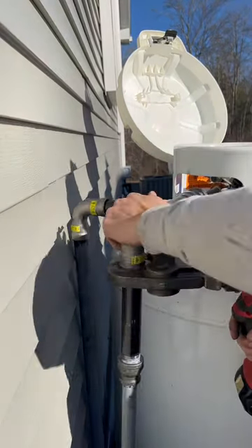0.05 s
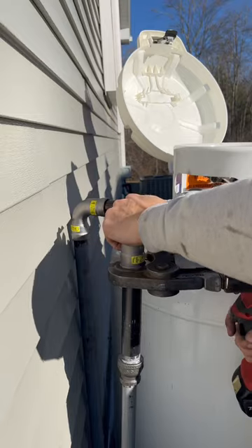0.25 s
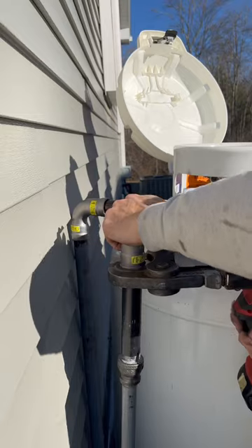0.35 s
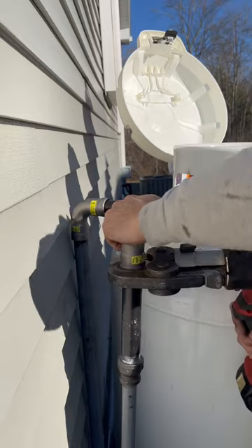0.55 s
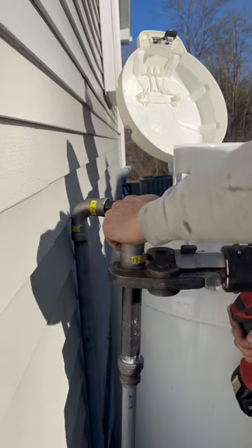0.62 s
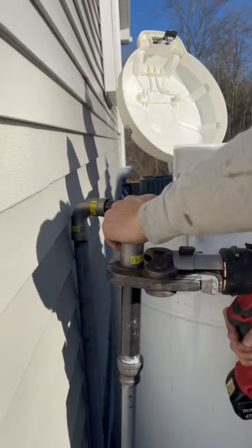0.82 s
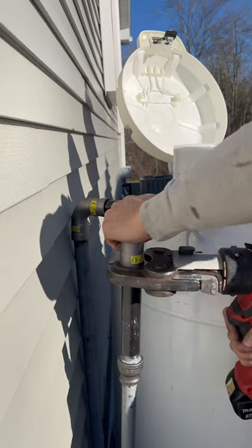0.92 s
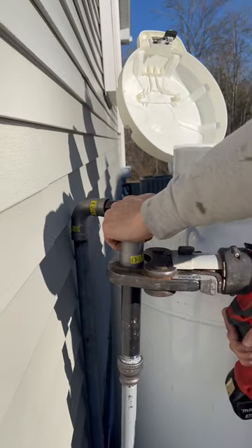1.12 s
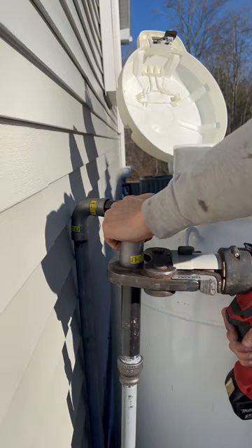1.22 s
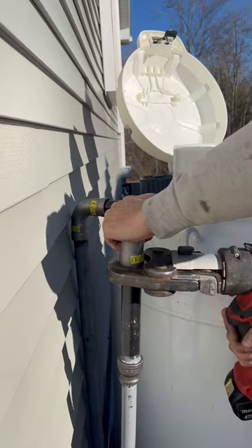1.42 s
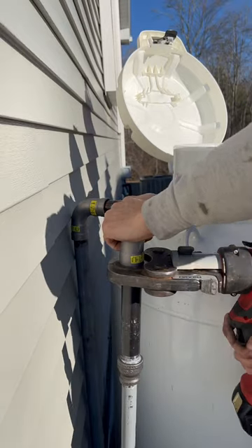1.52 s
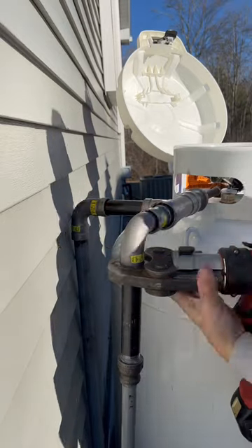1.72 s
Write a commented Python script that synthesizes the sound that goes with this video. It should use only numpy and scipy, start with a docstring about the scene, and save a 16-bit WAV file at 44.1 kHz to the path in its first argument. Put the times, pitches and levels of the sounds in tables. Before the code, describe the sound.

A cordless press tool crimps a pipe fitting close by, outdoors. The trigger clicks, the motor whines, then drops in pitch into a rattling buzz. A valve snaps, the motor stops and steel rings faintly. Light wind bumps the microphone.

```python
"""A cordless hydraulic press tool crimps a pipe fitting, outdoors beside a wall.
The trigger clicks and the geared motor spins up to a free whine. The jaws scrape on and bite:
the pitch sags and each pump stroke chops the whine into a buzz. The release valve snaps,
the motor stops, the steel rings faintly and one last click follows.
Throughout, light wind bumps the microphone over a quiet wash of air."""
import sys
import numpy as np
from scipy import signal
from scipy.fft import rfft, irfft
from scipy.io import wavfile
from scipy.ndimage import uniform_filter1d, map_coordinates

SR = 44100
rng = np.random.default_rng(int(sys.argv[2]) if len(sys.argv) > 2 else 0)


def to_wav(sig):
    """Store sig (one row per channel, or 1-D mono) as 16-bit WAV at the path in sys.argv[1].

    Samples outside -1..1 are clipped; the rate is SR.
    """
    pcm = np.clip(np.atleast_2d(sig), -1, 1) * 32767
    pcm = np.round(pcm).astype(np.int16)
    wavfile.write(sys.argv[1], SR, pcm.T)  # frames by channels


N = 77175
T = np.arange(N) / SR
HZ = np.fft.rfftfreq(N, 1 / SR)

# How hard the tool works: t/s, pump load 0-1, whine drive/dB, rattle level/dB
EFFORT = [(.42, 0, -49, -33), (.445, 0, -26.5, -27), (.52, 0, -27, -28), (.6, 0.02, -23.5, -26),
          (.65, 0.21, -28.5, -26), (.71, 0.2, -26.5, -27.5), (.77, .6, -24, -22), (.85, 0.74, -30.5, -23),
          (1, 0.76, -32.5, -24), (1.15, 0.79, -34, -25.5), (1.34, 0.94, -39.5, -27),
          (1.395, 0.9, -43, -26.5), (1.45, 1, -52, -25)]
# Bright EQ of the clicks and the oil hiss: f/Hz, gain/dB
CLICK_EQ = [(30, -55), (150, -32), (700, -9), (1600, 1), (4000, -2), (8000, 2), (11500, 5), (14000, -6),
            (16000, -4.5)]
# EQ of the open air and the echo: f/Hz, gain/dB
AIR_EQ = [(30, -39), (200, 3.5), (500, 2.5), (1000, -4), (2500, -11.5), (4000, -22), (7000, -15.5),
          (12000, -22.5), (16000, -19)]


def motor():
    """The geared motor drives the pump; whine, tones and rattle all follow its stroke rate."""
    stroke_rate = [(.42, 150), (.431, 187), (.439, 209.5), (.455, 213.5), (.49, 215.5), (.58, 216.4),
                   (.617, 215.5), (.656, 207), (.712, 205.5), (.752, 199), (.788, 186.4), (.81, 181),
                   (.86, 177.9), (1.002, 175.7), (1.09, 173), (1.18, 171.9), (1.292, 175.2), (1.338, 173.7),
                   (1.376, 167), (1.45, 145)]  # pump speed: t/s, rate/Hz
    start_s, stop_s = .419, 1.458
    turns = np.cumsum(curve(stroke_rate)) / SR  # one turn per pump stroke
    load = np.clip(curve(EFFORT), 0, 1)
    running = np.clip((T - start_s) / .0019, 0, 1) * np.exp(-np.maximum(T - stop_s, 0) / .004)
    return running * (gear_whine(turns, load) + drive_tones(turns) + rattle(turns, load) + jaw_scrape())


def gear_whine(turns, load):
    """Teeth mesh in a resonant gearbox; each loaded stroke slows the gears and presses them together."""
    gearbox_eq = [(4500, -8), (5400, -6), (5900, 6), (6250, -4), (6580, 5.5), (6850, -3.5), (7800, 0),
                  (9000, 10)]  # gearbox resonances: f/Hz, gain/dB
    teeth = 36
    swing = 2.3 * load * np.sin(2 * np.pi * (turns + .17))
    depth = 1.2 * np.sqrt(load)
    chop = np.exp(depth * np.cos(2 * np.pi * turns)) / np.sqrt(np.i0(2 * depth))  # constant power
    mesh = np.sqrt(2) * np.sin(2 * np.pi * teeth * turns + swing + .051 * wobble(250))
    mesh *= chop * (1 + .066 * wobble(300))
    whine = irfft(rfft(mesh) * amp(spectrum(gearbox_eq)), N)
    return pan(-3) * amp(curve(EFFORT, column=2)) * whine


def drive_tones(turns):
    """Motor, gears and pump sing harmonics of the stroke rate; a buzz joins them under load."""
    partials = [(1, 0.454, .55, -48, 0), (1, 0.62, 0.73, -47, 0), (1, 0.845, 1.08, -60.5, 2),
                (2, 0.597, .72, -38.5, 1), (3, 0.565, 0.66, -44.5, -1), (4, .58, .69, -43, 1),
                (6, 0.439, .79, -41.5, -0.5), (8, 0.82, 1.04, -46.5, 0), (8, 1.04, 1.38, -44, 2),
                (33, 0.43, 0.8, -37, -5.5), (34, .44, .64, -55, 4), (48, 0.429, 0.634, -33, -1),
                (48, 0.61, 0.705, -41, -1)]  # passing tones: harmonic, on/s, off/s, level/dB, left minus right/dB
    buzz_partials = [(3, -10), (4, -13), (5, -4), (6, 0), (7, -10), (9, 1.5), (10, -1.5), (11, 0),
                     (12, -0.5), (13, -0.5), (14, -13), (15, 1.5), (16, -0.5), (17, -3), (19, -14),
                     (21, -12), (22, -10), (23, -2.5)]  # timbre of the loaded pump: harmonic, gain/dB
    buzz_fader = [(.7, -58), (.8, -48), (.95, -48.5), (1.15, -60), (1.33, -61), (1.43, -52.5)]  # envelope of that buzz: t/s, level/dB
    fade_s, waver = .03, .25

    def harmonic(k):
        tone = np.sqrt(2) * np.sin(2 * np.pi * (round(k) * turns + rng.random()))
        return tone * (1 + waver * wobble(59))

    tones = np.zeros((2, N))
    for k, on, off, db, side_db in partials:
        fade = np.clip(np.minimum(T - on, off - T) / fade_s + .5, 0, 1)
        tones += pan(side_db) * amp(db) * fade * harmonic(k)
    buzz = sum(amp(db) * harmonic(k) for k, db in buzz_partials)
    return tones + amp(curve(buzz_fader)) * buzz


def rattle(turns, load):
    """Piston and valves knock on each stroke: loosely when running free, hard and evenly under load."""
    knocks = [(-.06, .05, 2.8), (.37, .04, 3.3), (.21, .05, .8)]  # hits within a stroke: position/strokes, width/strokes, strength
    free_eq = [(30, -60), (100, -60), (250, 1), (600, -8), (1000, -8.5), (1400, -0.5), (2200, -4),
               (3300, -1), (5100, -4), (6200, -3.5), (7300, 3), (8800, -2), (11300, -1), (13400, -5),
               (15500, -6)]  # free-running rattle: f/Hz, gain/dB
    loaded_eq = [(30, -65), (100, -17), (300, -13.5), (700, -17), (1500, -5.5), (2100, -8.5), (2600, -7),
                 (3900, -1), (4700, -13), (5500, 0), (6500, 2.5), (7400, -3), (8200, 4), (8650, 0.5),
                 (8950, 1.5), (9500, 3), (10200, 0.5), (11000, 1.5), (12200, 3.5), (12750, -1), (13400, 4),
                 (15500, -6.5)]  # rattle under load: f/Hz, gain/dB
    pulses = sum(gain * np.exp(-(((turns - at + .5) % 1 - .5) / width) ** 2)
                 for at, width, gain in knocks)
    accents = unit(1 + pulses)
    free = colour(housing(stroke_grit(turns, repeat=.3) * np.sqrt(accents)), free_eq)
    loaded = colour(housing(level_bands(stroke_grit(turns, repeat=.83) * accents)), loaded_eq)
    bite = np.clip(load / .8, 0, 1)
    return amp(curve(EFFORT, column=3)) * (np.sqrt(1 - bite) * free + np.sqrt(bite) * loaded)


def stroke_grit(turns, repeat):
    """Each stroke inherits some grit from the last; its out and back halves share part of their treble."""
    stroke_samples, twin_above_harmonic = 320, 58
    fresh = rng.standard_normal((2, N // 100, stroke_samples))
    grit = signal.lfilter([1], [1, -repeat], fresh, axis=1)
    treble = irfft(rfft(grit) * (np.arange(stroke_samples // 2 + 1) > twin_above_harmonic))
    grit = (grit + .6 * np.roll(treble, stroke_samples // 2, axis=2)).reshape(2, -1)
    return unit(np.array([map_coordinates(side, [turns * stroke_samples], order=3) for side in grit]))


def housing(pair):
    """Many narrow, fixed resonances of the casing ripple the spectrum."""
    ripple = uniform_filter1d(rng.standard_normal(len(HZ)), size=330)
    gain = amp(1.5 * unit(uniform_filter1d(ripple, size=250)))
    return irfft(rfft(pair) * unit(gain), N)


def release_valve():
    """The valve snaps: a bending wave arrives treble first, oil hisses off and the steel rings."""
    snap_eq = [(100, -41), (400, -7.5), (700, -1.5), (1150, 5), (1700, -0.5), (2500, -19), (4000, -9.5),
               (5500, -2.5), (7000, -14), (9000, -10), (16000, -24)]  # body of the snap: f/Hz, gain/dB
    steel_modes = [(1366, -12, .29), (1990, -7.5, 0.68), (3052, -6.5, .55), (3200, -23, 0.82),
                   (3537, -4.5, 0.85), (4070, -8, .39), (5615, -1, 0.27), (6040, 1, 0.39)]  # ringing steel: f/Hz, gain/dB, t60/s
    shimmer_eq = [(30, -50), (500, -15), (1400, 3), (2500, 3.5), (3500, 8.5), (4600, -2), (6100, 1),
                  (8000, -4.5), (12000, -10), (16000, -10)]  # noisy tail of the ring: f/Hz, gain/dB
    snap_s = 1.4512
    arrival_s = snap_s + .00225 * np.sqrt(1000 / (HZ + 100))
    phase = -2 * np.pi * np.cumsum(arrival_s) * SR / N
    snap = pan(1.1) * amp(5.5) * irfft(2 * amp(spectrum(snap_eq)) * np.exp(1j * phase), N)
    age = np.maximum(T - snap_s, 0)
    ring = np.zeros((2, N))
    for hz, db, t60 in steel_modes:
        mode = np.sin(2 * np.pi * hz * age + rng.normal(0, .47, (2, 1)))
        ring += amp(db - 60 * age / t60) * mode * (age > 0)
    shimmer = amp(-47.5) * burst(snap_s, rise_s=.001, decay_s=.095) * noise(shimmer_eq)
    oil_hiss = amp(-35) * burst(snap_s, rise_s=.001, decay_s=.012) * noise(CLICK_EQ, tilt_db=-2)
    return snap + amp(-47.5) * ring + shimmer + oil_hiss


def clicks():
    """Trigger, switch and jaws click: short, dry scrapes of plastic and steel."""
    hits = [(.021, -39, .0015, -1.5), (.047, -40, 0.0013, -1.5), (0.2328, -35, 0.0086, -2),
            (0.2359, -22, 0.004, 6.5), (0.2428, -20, 0.0024, 0), (.336, -39.5, 0.0026, -2),
            (0.409, -46, 0.0016, -6.5), (0.422, -27.5, 0.012, 5.5), (1.742, -28.5, 0.0069, -2)]  # click cues: t/s, level/dB, decay/s, tilt/(dB per octave)
    return sum(amp(db) * burst(s, .0014, decay) * noise(CLICK_EQ, tilt) for s, db, decay, tilt in hits)


def jaw_scrape():
    """The jaws grind onto the fitting in two dull swells."""
    scrapes = [(.6, 0.022, -43), (.67, .04, -46)]  # scrape cues: t/s, width/s, level/dB
    scrape_eq = [(30, -45), (130, -11), (260, 1), (500, -8), (750, 2.5), (1100, -8), (3000, -25),
                 (16000, -50)]  # low-mid grind: f/Hz, gain/dB
    return np.sqrt(swell_power(scrapes)) * noise(scrape_eq)


def wall_echo(tool):
    """Wall and yard return a short, diffuse tail."""
    t60_s = .26
    tail = noise(AIR_EQ, tilt_db=2.1) * amp(-60 * T / t60_s)
    return signal.fftconvolve(tool, tail / np.linalg.norm(tail[0]), axes=1)[:, :N]


def outdoors():
    """Wind bumps the microphone over faint handling rubs and a bed of air."""
    gusts = [(.02, 0.0083, -46), (0.132, 0.0062, -44.5), (.33, 0.013, -52.5), (0.769, 0.036, -45),
             (1.089, 0.0057, -38), (1.137, .014, -37), (1.18, .014, -36.5), (1.26, 0.022, -41.5),
             (1.39, 0.046, -45), (1.52, 0.025, -44), (1.58, .012, -46), (1.65, 0.016, -44),
             (1.702, 0.0065, -39), (1.745, 0.016, -46)]  # wind bumps: t/s, width/s, level/dB
    wind_eq = [(30, -45), (70, -39), (110, -16.5), (160, -5), (240, 0.5), (320, -1), (450, -16.5),
               (800, -23), (3000, -39.5), (16000, -83)]  # wind rumble: f/Hz, gain/dB
    rubs = [(.16, 0.068, -65), (1.71, 0.035, -55)]  # handling cues: t/s, width/s, level/dB
    rub_eq = [(30, -40), (1000, -11), (2400, 9), (3200, -7), (4300, 5), (5500, -9), (7300, -5.5),
              (10000, -12.5), (16000, -23)]  # thin handling rustle: f/Hz, gain/dB
    breeze_db, air_db = -61, -58
    wind = np.sqrt(amp(breeze_db) ** 2 + swell_power(gusts)) * noise(wind_eq)
    handling = np.sqrt(swell_power(rubs)) * noise(rub_eq)
    return wind + handling + amp(air_db) * noise(AIR_EQ)


def colour(pair, eq, tilt_db=0):
    """Gives two unrelated signals an EQ, a tilt per octave and the scene's stereo image, at rms 1."""
    coherence = [(100, .95), (250, .7), (500, .85), (1200, .97), (2200, .8), (3000, .65), (4000, .7),
                 (5300, .3), (6000, .55), (6500, .95), (9500, .99), (10400, .92), (11400, .65), (13500, .6),
                 (16000, .5)]  # how alike the channels are: f/Hz, correlation
    balance = [(60, 0), (300, 0), (1200, 2), (2900, 3.5), (4100, -3.5), (4800, 4.5), (5500, -10), (6400, 2),
               (8400, -2), (10400, 0), (11500, 6.5), (12800, 5), (15500, -4.5)]  # stereo lean: f/Hz, left minus right/dB
    left_lead = [(1500, 0.51), (2500, -0.38), (3100, -1.3), (4200, -1.17), (5000, 1), (6000, -0.1),
                 (6500, 0.95), (10500, 1), (11300, 0.24), (11800, -0.11), (12800, -3.1), (13400, -0.48),
                 (16000, 1)]  # phase between the channels: f/Hz, lead/rad
    a, b = rfft(pair)
    alike = np.clip(spectrum(coherence), -1, 1)
    mid, side = a * np.sqrt(1 + alike), b * np.sqrt(1 - alike)
    lean = amp(spectrum(balance) / 2) * np.exp(1j * spectrum(left_lead) / 2)
    gain = amp(spectrum(eq) + tilt_db * np.log2(HZ + 1))
    return unit(irfft(np.array([(mid + side) * lean, (mid - side) / lean]) * gain, N))


def noise(eq, tilt_db=0):
    """Coloured stereo noise."""
    return colour(rng.standard_normal((2, N)), eq, tilt_db)


def level_bands(pair):
    """Multiband leveller: holds the energy steady in every broad band."""
    frames = signal.stft(pair, nperseg=512)[2]
    power = uniform_filter1d(uniform_filter1d(abs(frames) ** 2, size=9, axis=1), size=4, axis=2)
    return unit(signal.istft(frames / np.sqrt(abs(power) + 1e-12), nperseg=512)[1][:, :N])


def wobble(hz):
    """Random modulation of rms 1, rolled off above hz."""
    return unit(irfft(rfft(rng.standard_normal(N)) * np.exp(-(HZ / hz) ** 2), N))


def burst(peak_s, rise_s, decay_s):
    """Envelope with a linear attack and an exponential fall."""
    return np.clip((T - peak_s) / rise_s + 1, 0, 1) * np.exp(-np.maximum(T - peak_s, 0) / decay_s)


def swell_power(cues):
    """Power envelope of a set of bell-shaped swells."""
    return sum(amp(db) ** 2 * np.exp(-((T - s) / width) ** 2) for s, width, db in cues)


def curve(table, column=1):
    """One column of a table as an automation curve."""
    table = np.array(table)
    return np.interp(T, table[:, 0], table[:, column])


def spectrum(points):
    """Breakpoints joined on a log frequency axis."""
    hz, value = np.transpose(points)
    return np.interp(np.log(HZ + 1), np.log(hz), value)


def pan(db):
    """Channel gains for a left minus right level."""
    return amp(np.array([[db], [-db]]) / 2)


def amp(db):
    """Decibels to gain."""
    return 10 ** (np.asarray(db) / 20)


def unit(x):
    """Scales to rms 1."""
    return x / np.sqrt(np.mean(abs(x) ** 2) + 1e-20)


def scene():
    """The tool up front, its faint echo behind, and the open air."""
    tool = motor() + clicks() + release_valve()
    return tool + amp(-25.5) * wall_echo(tool) + outdoors()


def record(dry):
    """A steep high cut on the whole mix."""
    cut_hz = 15900
    lowpass = signal.firwin(401, cut_hz, window=("kaiser", 9), fs=SR)
    return signal.oaconvolve(dry, lowpass[None], "same")


dry = scene()
out = record(dry)
to_wav(out)
```